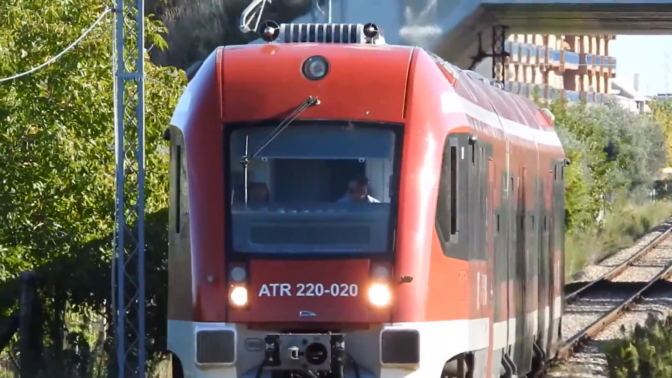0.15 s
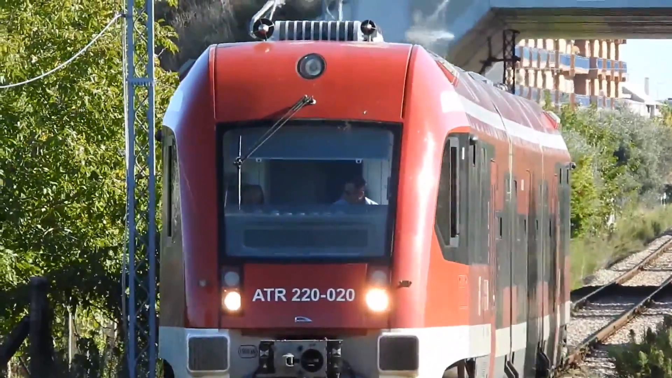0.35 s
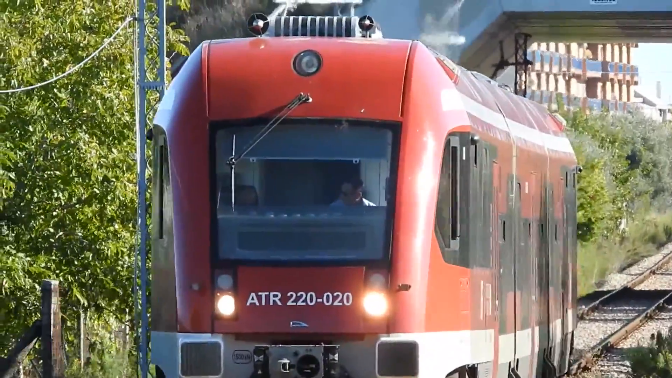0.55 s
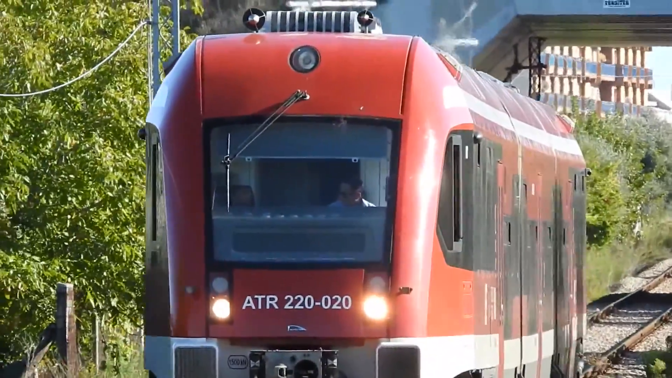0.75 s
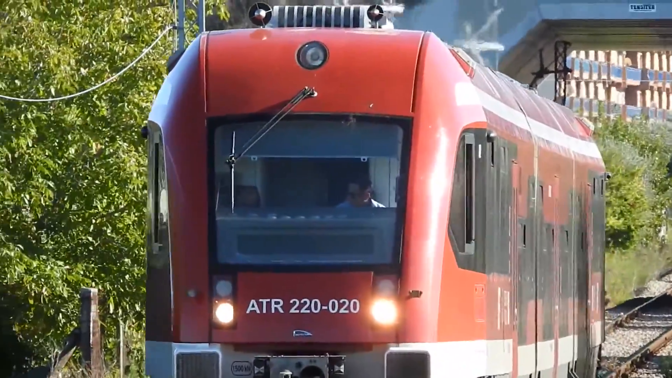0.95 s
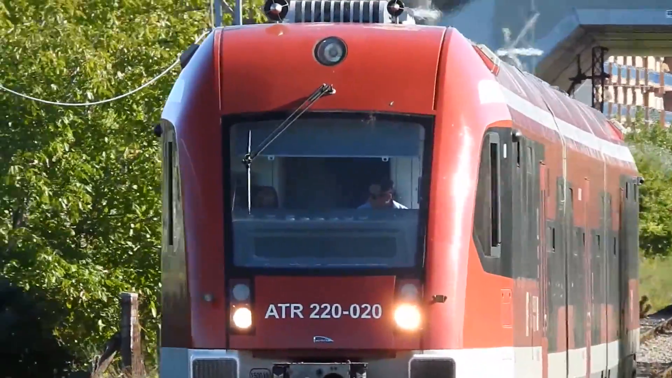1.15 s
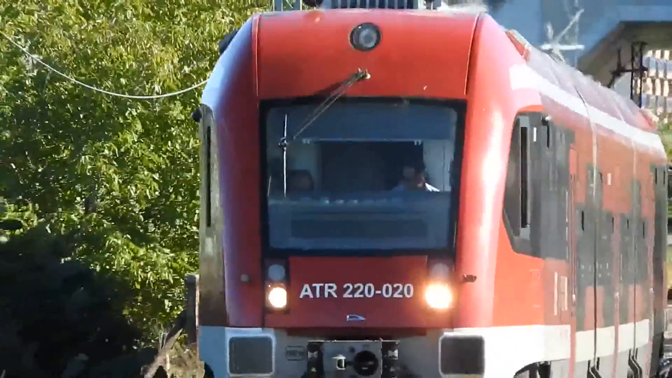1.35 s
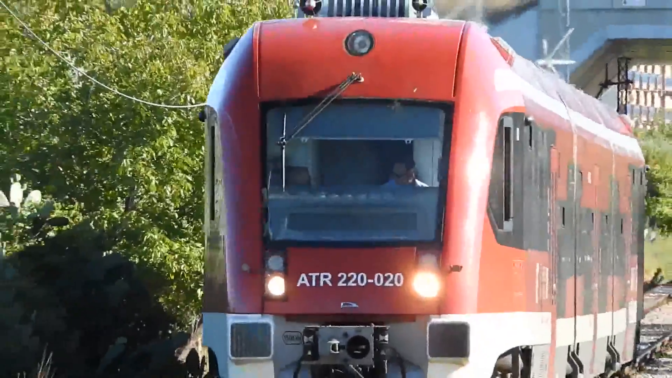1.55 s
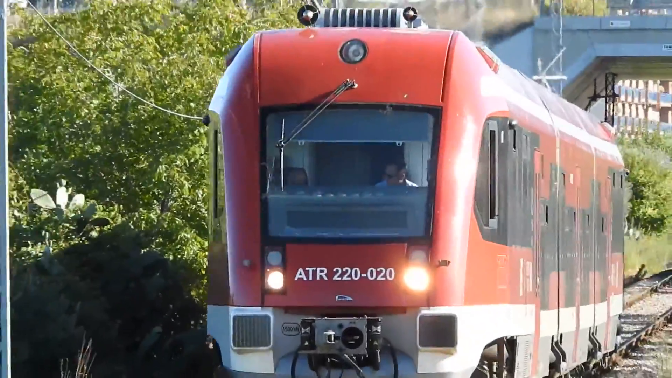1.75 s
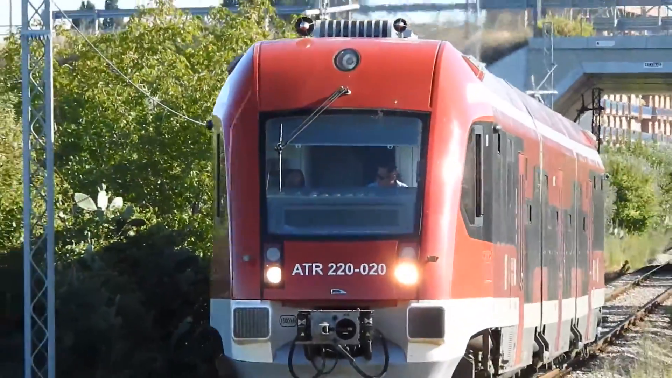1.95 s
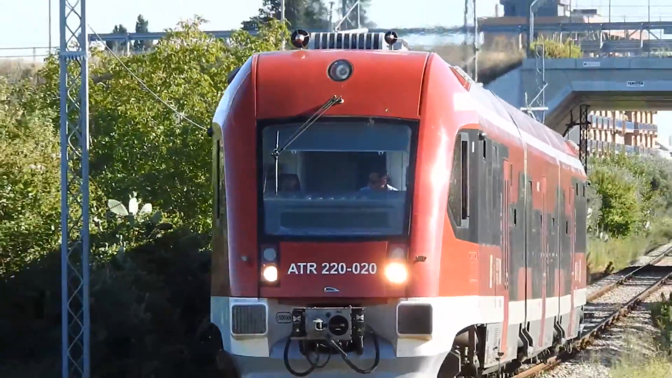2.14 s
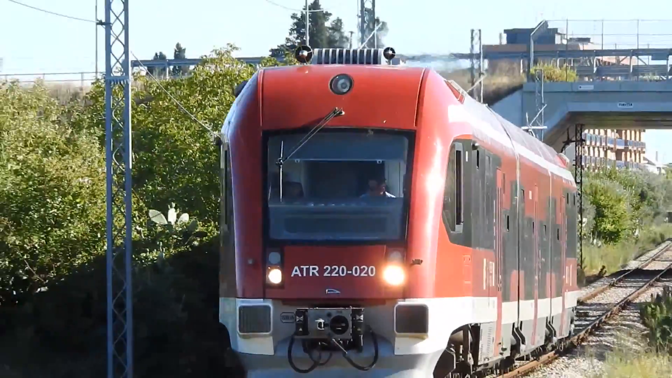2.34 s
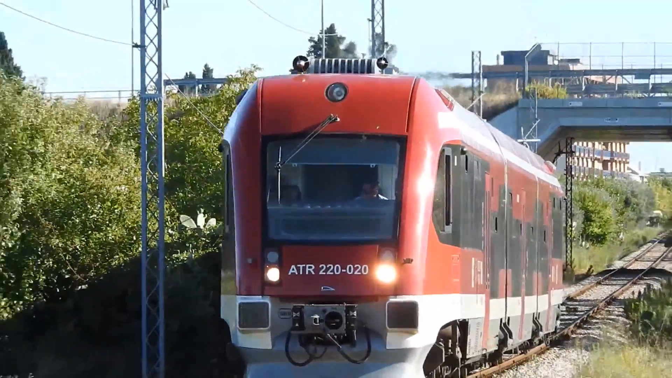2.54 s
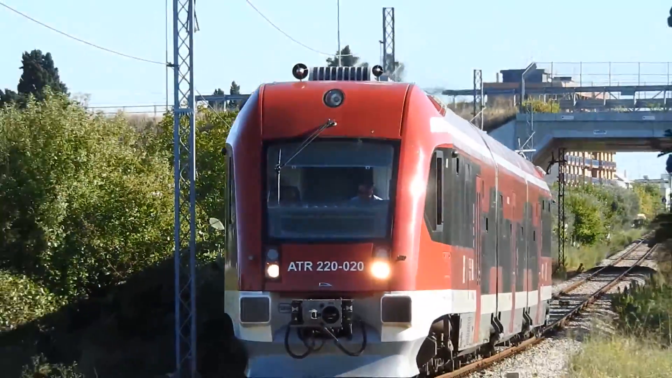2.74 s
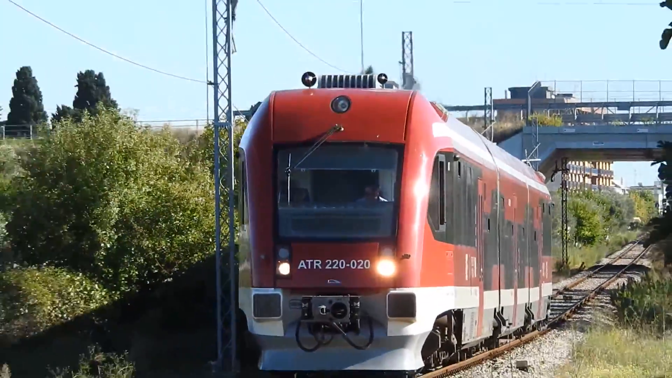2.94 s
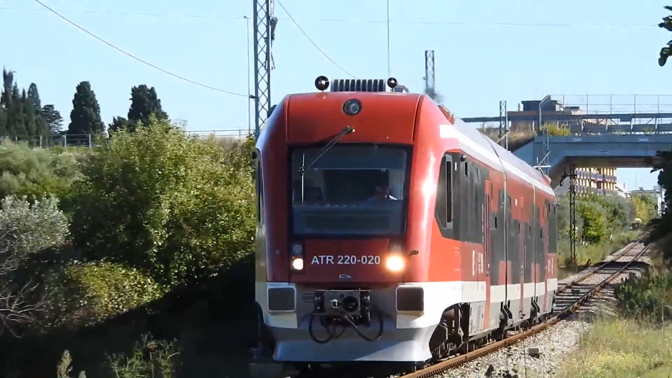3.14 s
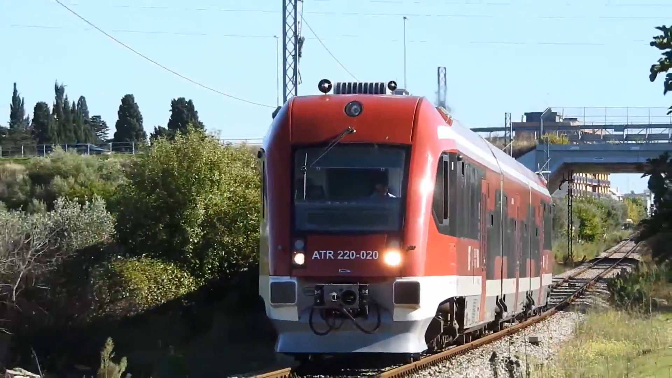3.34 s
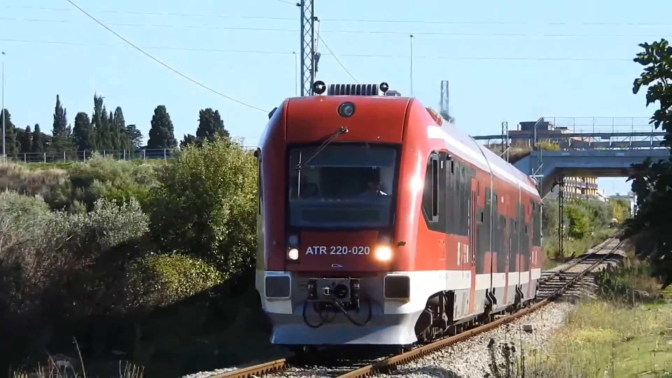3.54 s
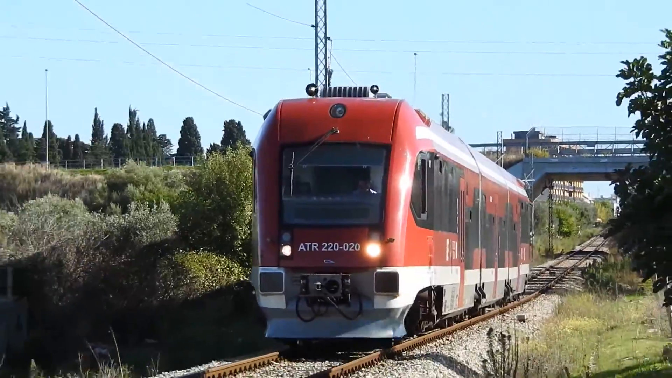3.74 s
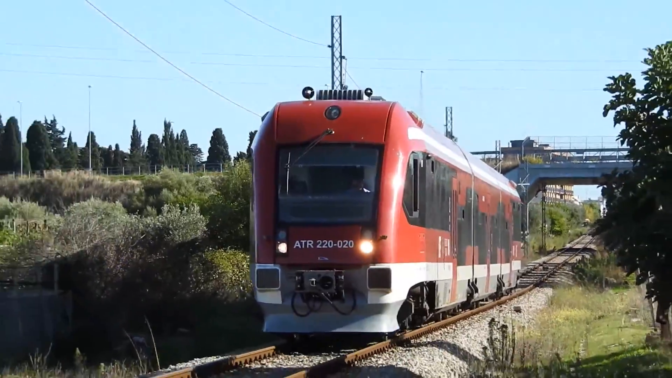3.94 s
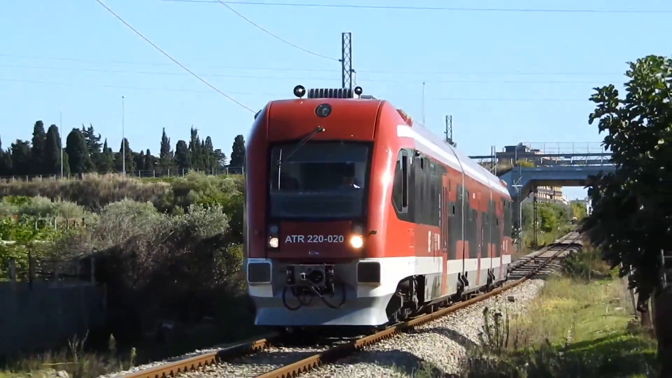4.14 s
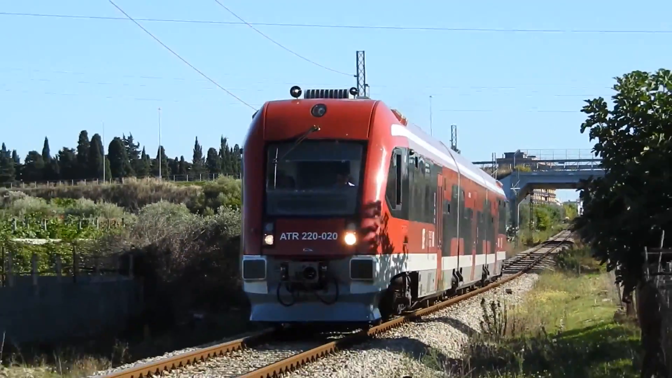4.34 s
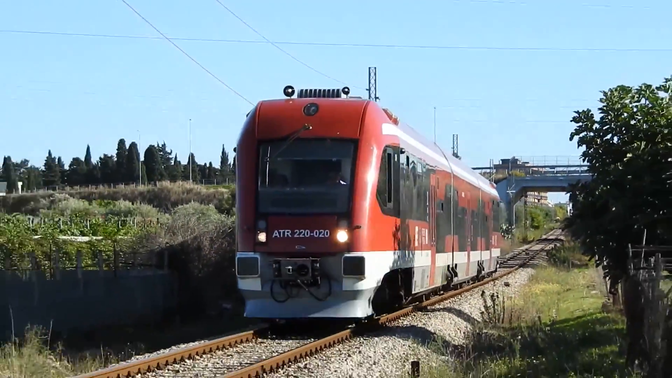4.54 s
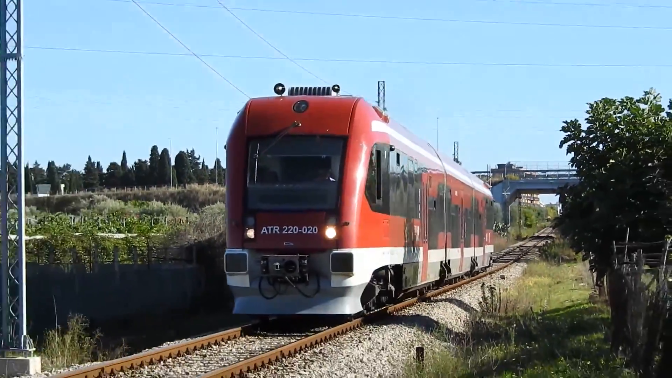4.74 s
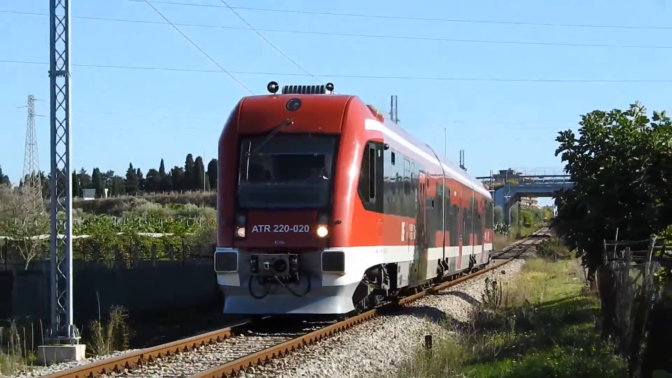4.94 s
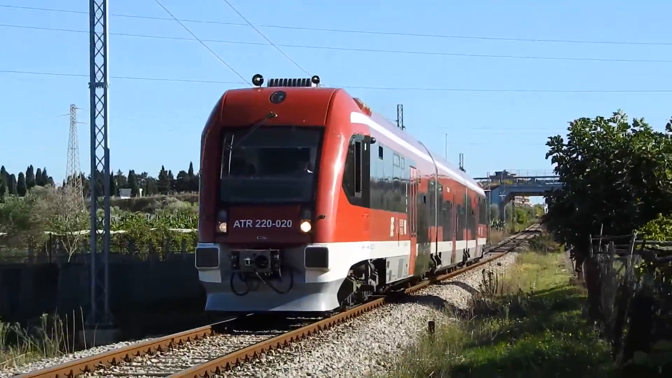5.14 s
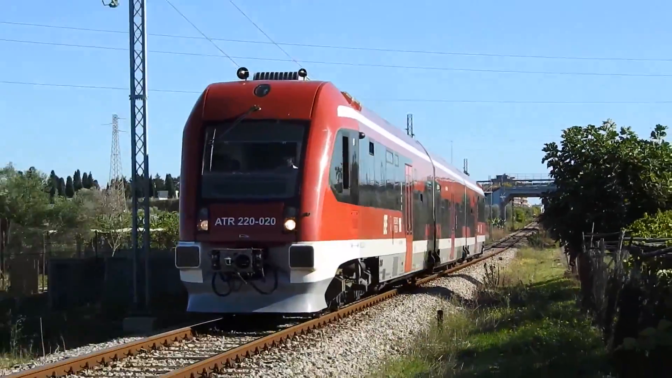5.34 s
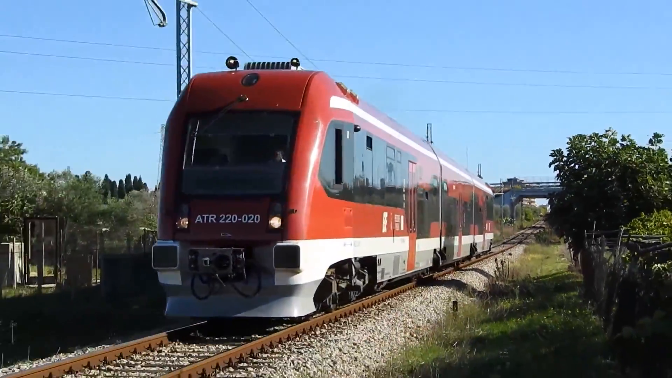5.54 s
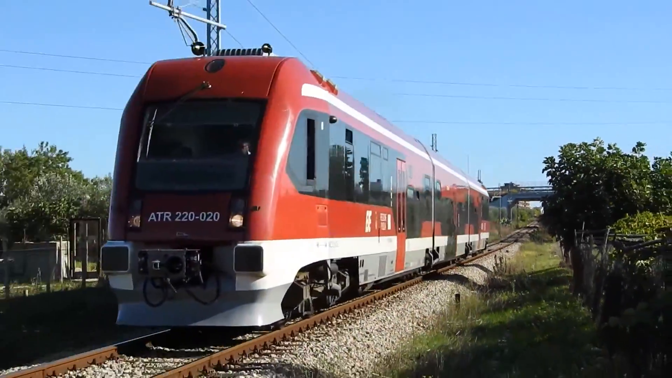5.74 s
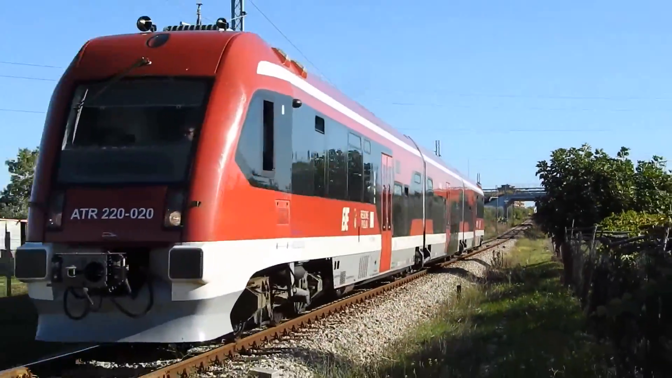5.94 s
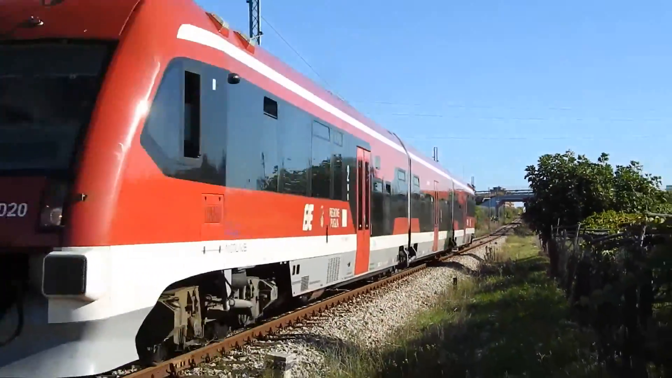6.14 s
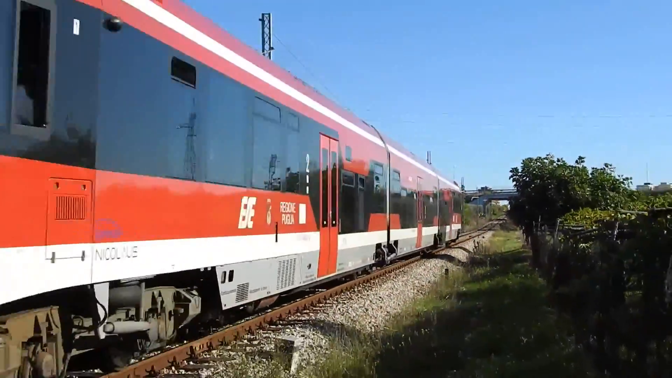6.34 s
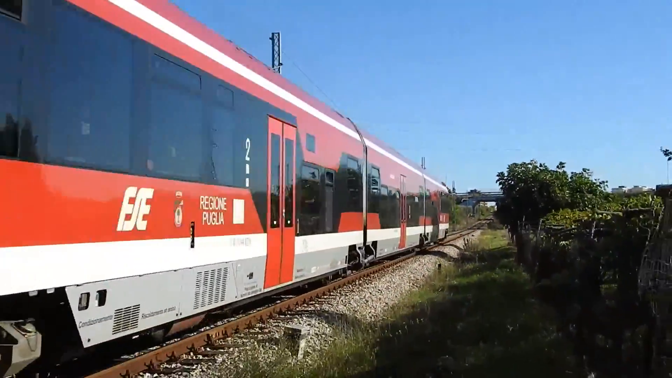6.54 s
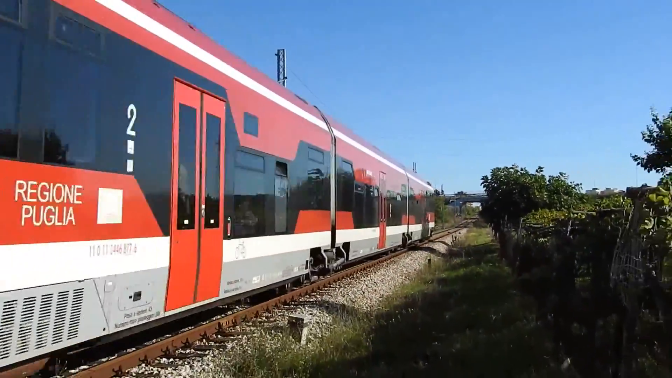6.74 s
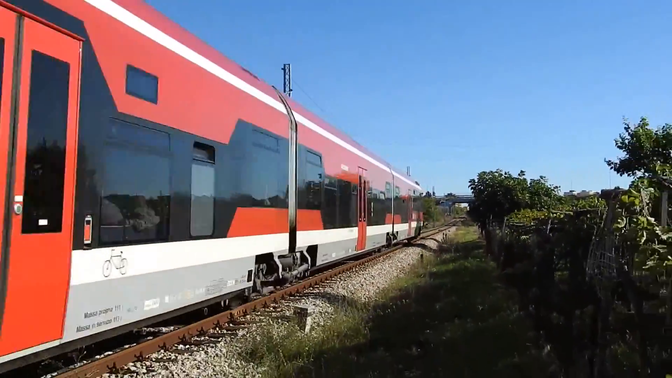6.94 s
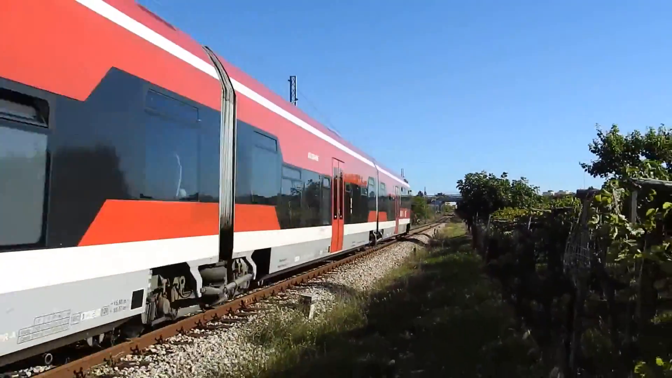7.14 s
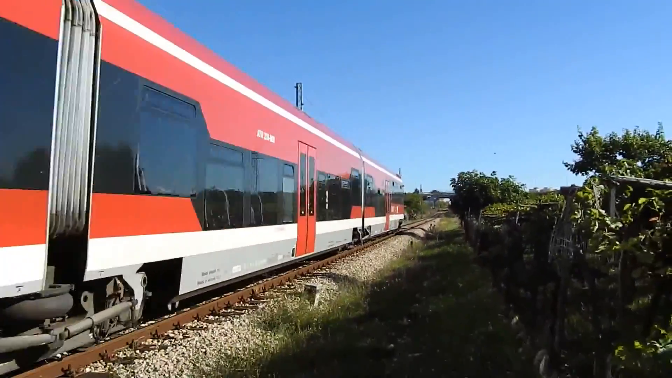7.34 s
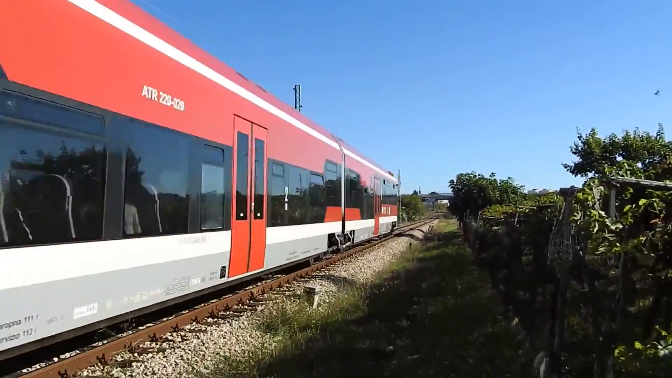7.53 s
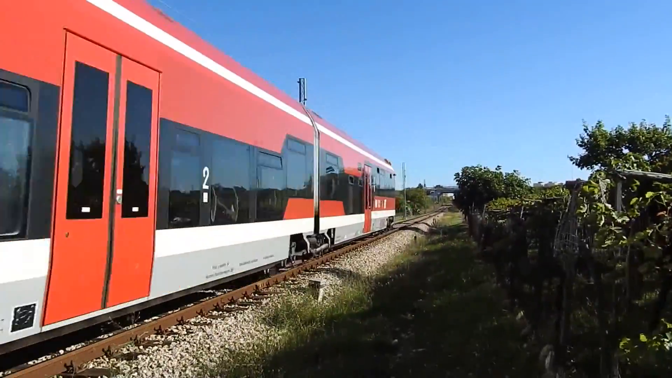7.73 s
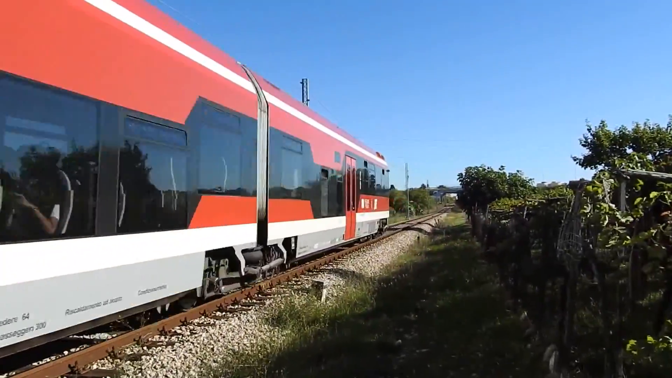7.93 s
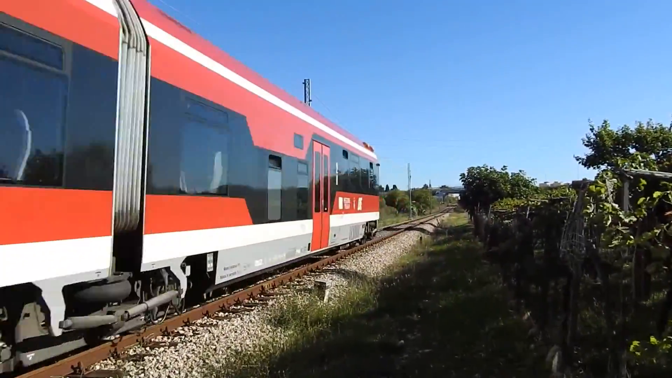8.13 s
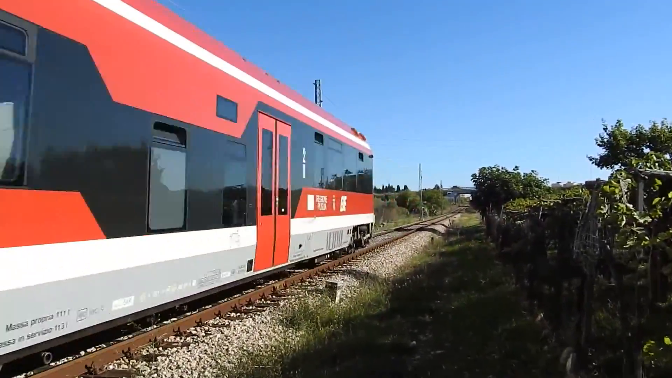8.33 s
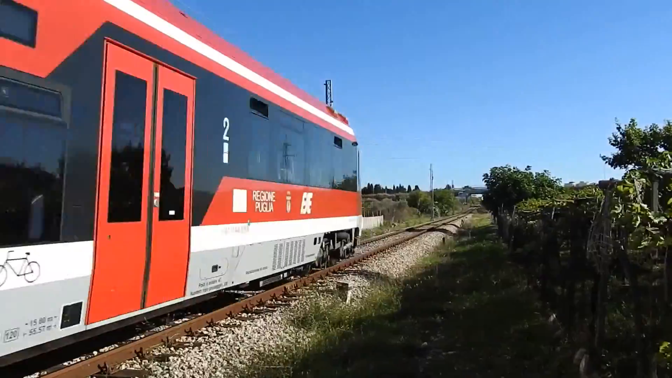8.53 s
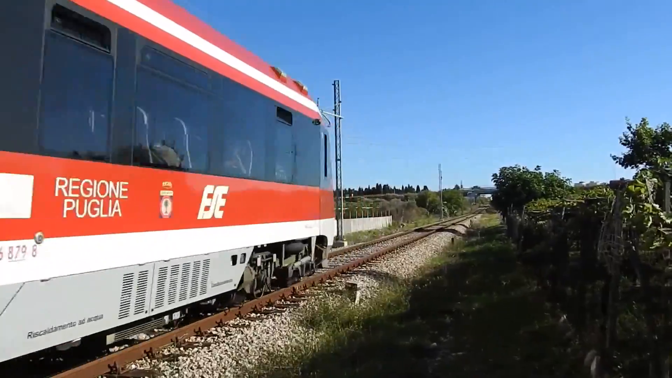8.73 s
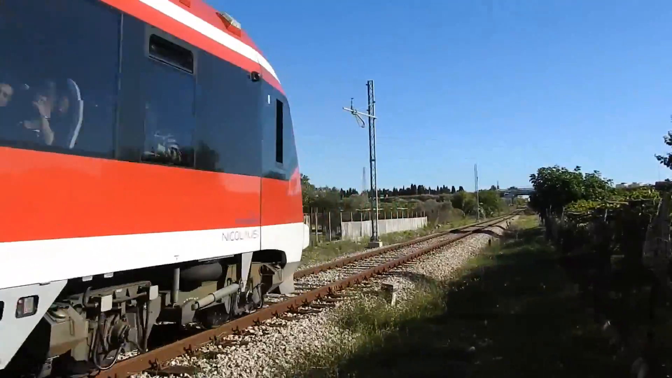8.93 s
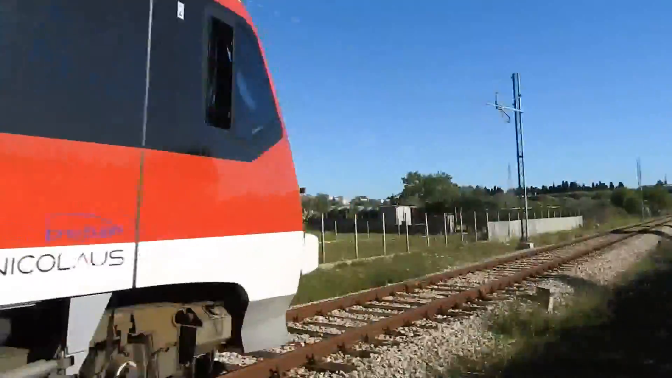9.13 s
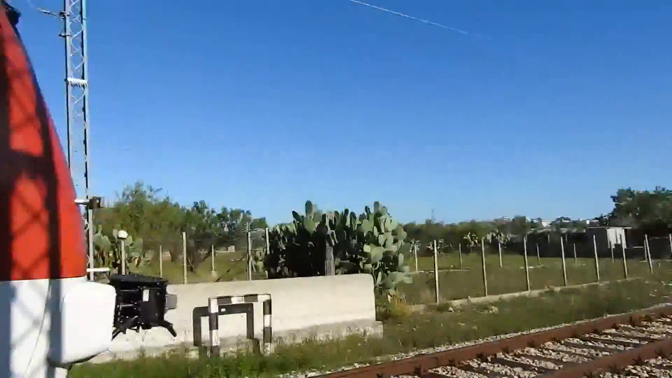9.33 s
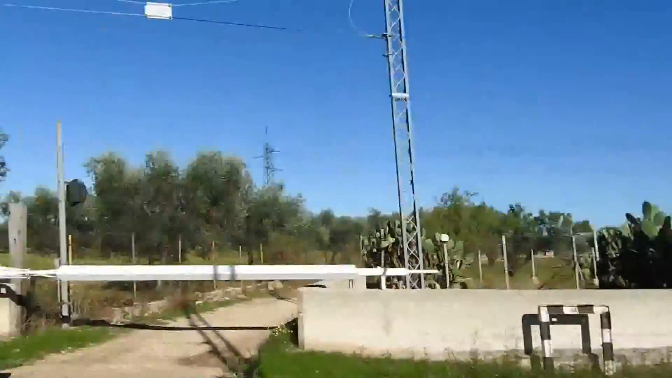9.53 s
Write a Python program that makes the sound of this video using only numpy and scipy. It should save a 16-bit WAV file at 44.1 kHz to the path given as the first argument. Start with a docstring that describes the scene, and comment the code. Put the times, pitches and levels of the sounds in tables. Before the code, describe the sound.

Heard from beside an open-air track, a low diesel hum approaches, with a few soft gusts on the microphone and a quiet lens motor whirr. The drone rises slightly, swells and throbs. Then the train rolls by close on the left: a cluster of sharp knocks at a rail joint, followed by lighter clacks, growling wheels, short chirps and a high, airy whistle, as the engine note drops.

```python
"""A distant diesel drone comes round a bend while wind puffs at the microphone and a camera's zoom whirrs.
The railcar opens its throttle and passes close on the left: two exhausts drone and beat, two turbos
whistle, each sinking in pitch as it goes by. Flanges chirp on the curve, and four bogies knock over a
rail joint and growl past, rough wheels on rough rail. The hardest knock ducks the limiter."""
import sys
import numpy as np
from scipy import signal
from scipy.fft import irfft
from scipy.io import wavfile
from scipy.ndimage import uniform_filter1d

SR = 44100
rng = np.random.default_rng(int(sys.argv[2]) if len(sys.argv) > 2 else 0)


def wrap_up_sound(samples):
    """Save the sound to the file named by the first command line argument, as 16-bit audio."""
    columns = np.atleast_2d(samples).T
    # keep every value between -1 and 1, then stretch to whole-number steps
    tamed = np.clip(columns, -1, 1)
    steps = np.round(tamed * 32767).astype(np.int16)
    wavfile.write(sys.argv[1], SR, steps)


N = 426888
T = np.arange(N) / SR
HZ, FRAME_S = np.fft.rfftfreq(1024, 1 / SR), np.arange(N // 512 + 2) * 512 / SR  # grid for shaping noise
SPEED_M_PER_S, SOUND_M_PER_S, TRACK_AWAY_M = 18.5, 343, 4.0
AHEAD, BESIDE = 0.16, 0.91  # the train's first and last bearing

# the throttle both diesels follow: time_s, firing_hz
THROTTLE = [(0, 87.47), (3.55, 88.8), (4.1, 94.73), (4.9, 99.73), (8.05, 100.2), (9.68, 87.3)]
# bogies going by: abreast_s, rumble_db, growl_db, roar_db, hiss_db, air_db, clatter_db
BOGIES = [(6.67, -52, -21, -31, -32, -31, -31), (7.53, -26.5, -24.5, -40.5, -36.5, -46, -26),
          (8.359, -27.5, -18.5, -32, -38, -43, -24), (9.16, -20.5, -17, -21.5, -27.5, -31.5, -24)]


def amp(db):
    """Decibels to gain."""
    return 10 ** (np.asarray(db) / 20)


def evened(x):
    """Scales to an rms of one."""
    return x / np.sqrt(np.mean(x ** 2) + 1e-20)


def curve(rows, t):
    """A breakpoint envelope, joined by straight lines."""
    return np.interp(t, *np.transpose(rows))


def by_hz(rows, column=1):
    """One column of a table, along log frequency."""
    rows = np.array(rows)
    return np.interp(np.log(HZ + 1), np.log(rows[:, 0]), rows[:, column])


def add(mix, start_s, sound):
    """Mixes a sound in at a given time."""
    part = mix[..., round(start_s * SR):][..., :sound.shape[-1]]
    part += sound[..., :part.shape[-1]]


def wander(rate_hz, t=T):
    """Random drift of about unit size."""
    return np.interp(t * rate_hz, np.arange(1000), rng.standard_normal(1000))


def resonate(x, hz, width_hz):
    """A steep resonance that can follow a moving pitch, at unit rms."""
    carrier = np.exp(2j * np.pi * np.cumsum(hz * np.ones(x.shape[-1])) / SR)
    pole = np.exp(-np.pi * width_hz / SR)
    return evened((carrier * signal.lfilter([1], [1, -2 * pole, pole * pole], x / carrier)).real)


def panned(left_db):
    """Left and right gains for a level difference."""
    return amp(np.array([np.atleast_1d(left_db), -np.atleast_1d(left_db)]) / 2)


def bearing(t):
    """The train swings round to the left as its nose goes by: 0 is ahead, 1 beside."""
    swing_s, swing_lasts_s = 6.38, 0.45
    return AHEAD + (BESIDE - AHEAD) * (1 + np.tanh((t - swing_s) / swing_lasts_s)) / 2


def passing(abreast_s, reach_m, t=T):
    """Gain of a part that radiates sideways: 1 when abreast, fading with distance along the track."""
    return (1 + (SPEED_M_PER_S * (t - abreast_s) / reach_m) ** 2) ** -.75


def approach(abreast_s):
    """Share of the train's speed that points at the listener: 1 coming, -1 going."""
    to_go_m = SPEED_M_PER_S * (abreast_s - T)
    return to_go_m / np.hypot(to_go_m, TRACK_AWAY_M)


def doppler(abreast_s):
    """Pitch factor of a passing part: sharp coming, flat going."""
    return 1 / (1 - approach(abreast_s) * SPEED_M_PER_S / SOUND_M_PER_S)


def shaded(abreast_s, behind_db):
    """Gain of an outlet that throws its sound forwards, and so is quieter once it has gone by."""
    return amp(behind_db * (1 - approach(abreast_s)) / 2)


def exhaust(abreast_s, late_s, level_db, jitter, waver_db):
    """Six cylinders fire three times a turn, unevenly, which adds weak, wavering orders in between."""
    # exhaust partials: crank_multiple, gain_db
    orders = [(2, -33), (3, -0.5), (4, -25.5), (4.5, -24.5), (5, -24), (6, -23.5), (7, -41), (7.5, -30),
              (9, -37.5), (10, -36), (11, -41), (12, -32), (13, -39), (13.5, -37), (15, -40.5)]
    firing_hz = curve(THROTTLE, T - late_s) * doppler(abreast_s)
    crank_turns = np.cumsum(firing_hz * (1 + jitter * wander(18))) / (3 * SR)
    out = np.zeros(N)
    for order, db in orders:
        weight = np.interp(T, FRAME_S, amp(db + waver_db * (db < -10) * wander(8.1, FRAME_S)))
        out += weight * np.sin(2 * np.pi * (order * crank_turns + rng.random()))
    return np.sqrt(2) * amp(level_db) * out


def beating_db():
    """Six dips in the drone: the engines beat as they run up, ever slower as their speeds draw together."""
    start_s, first_beat_s, growth, dip_db = 4.31, 0.1662, 1.348, -5.5
    lengths_s = first_beat_s * growth ** np.arange(6)
    times_s = start_s + np.cumsum(lengths_s) - lengths_s
    return dip_db * sum(np.exp(-((T - s) / (0.2 * length)) ** 2) for s, length in zip(times_s, lengths_s))


def engines():
    """The drone of the front and rear diesels, over the hum of the auxiliary machines."""
    # fader ride of the front exhaust: time_s, level_db
    front_ride = [(0, -46), (.2, -30.5), (1.3, -29), (2.1, -32.5), (3.5, -22), (4.1, -20), (4.85, -12),
                  (5.53, -9), (5.82, -12), (6.18, -10), (6.29, -14), (6.4, -19), (6.8, -28.5), (7.1, -16),
                  (7.28, -16.5), (7.43, -25.5), (7.95, -23.5), (8.2, -27.5), (9.68, -43)]
    # auxiliary machines: pitch_hz, level_db
    hum_tones = [(61.5, -42), (155.3, -40), (255, -60), (368, -62), (742, -67)]
    # where the drone sits in the stereo field: time_s, left_db
    drone_pan = [(2, -1.5), (4.8, 0.4)]
    front_s, rear_s = 7.13, 9.07  # when each is abreast
    front_db = curve(front_ride, T) + beating_db()
    front = exhaust(front_s, late_s=0, level_db=front_db, jitter=.00475, waver_db=4)
    rear = exhaust(rear_s, late_s=.18, level_db=-21.5, jitter=.004, waver_db=2)
    rear *= passing(rear_s, reach_m=5) * shaded(rear_s, behind_db=-10)
    hum = sum(amp(db + 2.7 * wander(5.5)) * np.sin(2 * np.pi * hz * T + 0.5 * wander(4.6))
              for hz, db in hum_tones)
    return (front + rear + np.sqrt(2) * hum) * panned(curve(drone_pan, T))


def band(ahead, beside, level_db, flicker_db):
    """Power over time and frequency of one noise, whose colour swings round with the train."""
    side = bearing(FRAME_S)[:, None]
    power = (1 - side) * evened(amp(by_hz(ahead))) ** 2 + side * evened(amp(by_hz(beside))) ** 2
    flicker = evened(uniform_filter1d(rng.standard_normal(len(FRAME_S)), size=2))
    return power * amp(level_db + flicker_db * flicker)[:, None] ** 2


def rush(power, patchy_db):
    """Patchy noise of the given power, as the two microphone ports hear it from the train's bearing."""
    # stereo image: freq_hz, coherence_ahead, coherence_beside, left_beside_db, lag_beside_rad
    ports = [(60.4, 0.075, 0.44, 0, -1), (150, 0.63, 1, -1, 0), (298, 0.9, 0.98, 8.5, 0.5),
             (970, 0.96, 0.97, 9, -0.2), (2600, 0.72, 0.5, 8, 1), (5511, 0.62, 0.72, 8, -1.5),
             (7900, 0.307, 0.76, 6.5, -2.5), (12200, 0.37, 1, -2, -3.5)]
    a, b, c, d, patches = rng.standard_normal((5,) + power.shape)
    patches = evened(uniform_filter1d(uniform_filter1d(patches, size=3, axis=0), size=8, axis=1))
    side = bearing(FRAME_S)[:, None]
    coherence = np.clip((1 - side) * by_hz(ports) + side * by_hz(ports, column=2), -1, 1)
    lean = amp(side * by_hz(ports, column=3) / 2)
    lag = np.exp(-1j * side ** 2 * by_hz(ports, column=4))
    left = a + 1j * b
    right = coherence * left + np.sqrt(1 - coherence ** 2) * (c + 1j * d)
    spectra = np.array([left * lean, right * lag / lean])
    spectra *= np.sqrt(power) * amp(patchy_db * patches) / np.hypot(lean, 1 / lean)
    frames = irfft(spectra, norm="ortho") * signal.windows.cosine(1024)
    return (frames[:, :-1, 512:] + frames[:, 1:, :512]).reshape(2, -1)[:, :N]  # overlap and add


def train_db(layer):
    """Level of one rolling layer: the whole train, fading with distance, plus each part going by."""
    # the whole train, by layer: ahead_db, beside_db, reach_m, ground_loss_db_per_m, background_db
    train_noise = {"rumble": (-23.5, -28, 40, 0.12, -42.5), "growl": (-31, -28.5, 55, 0.25, -64),
                   "roar": (-30, -30.5, 30, 0.35, -53), "hiss": (-35, -41.5, 17.5, 0.09, -58.5),
                   "air": (-38.5, -46, 22.5, 0.17, -66)}
    # nose and underfloor equipment: abreast_s, rumble_db, growl_db, roar_db, hiss_db, air_db
    body_parts = [(6.13, -22, -25.5, -26, -32, -30.5), (7.02, -43, -46, -25, -30.5, -31.5),
                  (8.57, -27, -44, -28, -33, -40.5), (9.42, -46, -29, -27.5, -33.5, -32.5)]
    # how near a part must be to stand out: rumble_m, growl_m, roar_m, hiss_m, air_m
    part_reach_m = [3.3, 3.5, 4, 4.1, 4.4]
    ahead_db, beside_db, reach_m, loss_db_per_m, background_db = train_noise[layer]
    column = list(train_noise).index(layer)
    arrives_s, leaves_s = 5.397, 9.9
    away_m = SPEED_M_PER_S * abs(FRAME_S - np.clip(FRAME_S, arrives_s, leaves_s))
    swing = (bearing(FRAME_S) - AHEAD) / (BESIDE - AHEAD)
    whole_db = ahead_db + (beside_db - ahead_db) * swing - loss_db_per_m * away_m
    power = amp(whole_db) ** 2 / (1 + (away_m / reach_m) ** 2)
    for abreast_s, *levels_db in [*BOGIES, *body_parts]:
        power += (amp(levels_db[column]) * passing(abreast_s, part_reach_m[column], FRAME_S)) ** 2
    return 10 * np.log10(power + amp(background_db) ** 2)


def clatter_db():
    """Level of the brief roar of each bogie on a rail joint, just before it comes abreast."""
    joint_ahead_m, reach_m = 8.3, 1.1
    early_s = joint_ahead_m / SPEED_M_PER_S
    power = sum((amp(db) * passing(s - early_s, reach_m, FRAME_S)) ** 2 for s, *_, db in BOGIES)
    return 10 * np.log10(power)


def rolling():
    """Rough wheels on rough rail: ground rumble, bogie growl, wheel roar, rail hiss and rushing air."""
    # each layer's colour from ahead and from beside: freq_hz, relative_db
    rumble_ahead = [(20, -48), (35, -48), (50, -41), (64, 0), (85, 9), (120, 0), (150, -2.5), (195, -10.5),
                    (235, -16), (290, -33), (900, -100)]
    rumble_beside = [(20, -42), (35, -39), (50, -33), (64, -4), (85, -1.5), (120, -14), (150, 1),
                     (195, 5.5), (235, -0.5), (290, -43), (900, -100)]
    growl_ahead = [(170, -45), (245, -2), (285, -9.5), (325, 3), (375, -2), (440, -4.5), (500, -3),
                   (560, -24), (700, -14), (1500, -100)]
    growl_beside = [(150, -35), (235, -20), (275, -4), (320, 3), (350, -8), (390, 0.5), (440, -5),
                    (500, -8.5), (560, -12.5), (700, -15), (1500, -100)]
    roar_ahead = [(300, -60), (480, -15), (560, -4), (700, -2), (850, 1.5), (985, -0.5), (1190, -9.5),
                  (1360, -5), (1650, -24), (1900, -40), (4000, -100)]
    roar_beside = [(300, -60), (480, -15), (560, -0.5), (770, -4.5), (1130, -7), (1650, -17), (1900, -30),
                   (4000, -100)]
    hiss_ahead = [(900, -49), (1500, 2.5), (1750, -1.5), (2100, 0.5), (2540, 1), (3000, -2.5), (3500, -4.5),
                  (4030, -1.5), (4700, -9), (5700, -8), (6700, -4.5), (7400, -9.5), (12000, -68)]
    hiss_beside = [(900, -70), (1500, -9), (1750, 0), (2000, -1.5), (2400, 0.5), (3120, -2), (3700, -3.5),
                   (4150, -3), (5200, -4.5), (6700, -6.5), (7400, -11), (12000, -70)]
    air_ahead = [(3000, -70), (6500, -23), (7100, 1.5), (8500, -1), (10000, 3), (11300, 2.5), (11900, -12),
                 (12500, -4.5)]
    air_beside = [(3000, -70), (6500, -4), (7100, -3), (8500, 1), (10000, 4), (11000, 1.5), (11600, -8),
                  (12300, -16)]
    rumble = band(rumble_ahead, rumble_beside, train_db("rumble"), flicker_db=0.36)
    growl = band(growl_ahead, growl_beside, train_db("growl"), flicker_db=1.56)
    roar = band(roar_ahead, roar_beside, train_db("roar"), flicker_db=0)
    clatter = band(roar_ahead, roar_beside, clatter_db(), flicker_db=-3)
    clatter += band(hiss_ahead, hiss_beside, clatter_db() - 14, flicker_db=-0.5)
    hiss = band(hiss_ahead, hiss_beside, train_db("hiss"), flicker_db=0.16)
    air = band(air_ahead, air_beside, train_db("air"), flicker_db=0.5)
    return rush(rumble + growl + roar + clatter + hiss + air, patchy_db=1.5)


def wind():
    """Short low puffs buffet the microphone, mostly on the right port."""
    # colour of the buffeting: freq_hz, relative_db
    colour = [(20, -44), (60, -11), (110, 3.5), (160, 3), (210, -7), (280, -21), (450, -22), (1500, -100)]
    # puffs of wind: peak_s, gain_db, half_length_s
    puffs = [(0.391, -27.5, 0.06), (1.3, -27.5, 0.16), (2.493, -26.5, 0.13), (2.585, -19, 0.082),
             (2.739, -14.5, 0.036), (2.805, -13.5, 0.036), (2.86, -22, 0.04), (2.906, -14, 0.0095),
             (2.947, -14, 0.024), (3.008, -18, 0.02), (3.101, -18, 0.065), (3.507, -24, 0.058),
             (3.703, -28, 0.12)]
    strength = sum(amp(db) * np.exp(-2 * np.minimum(abs(T - s) / half_s, 10) ** 2)
                   for s, db, half_s in puffs)
    buffet = rush(band(colour, colour, level_db=-6.5, flicker_db=2), patchy_db=0.5)
    return buffet * strength * panned(-11)


def burst(peak_s, level_db, pitch_hz, length_s, width_hz):
    """One short swell of noise in a resonance, placed on the timeline."""
    out, count = np.zeros(N), round(length_s * SR)
    ring = evened(resonate(rng.standard_normal(SR), pitch_hz, width_hz)[-count:])
    add(out, peak_s - length_s / 2, amp(level_db) * ring * np.hanning(count))
    return out


def camera_zoom():
    """The zoom lever ticks and the lens motor whirrs in the camera's shell, swelling until it stops."""
    # resonances of the whirr: pitch_hz, width_hz, relative_db
    resonances = [(1297, 50, -3), (2240, 60, -6), (2730, 80, -10), (2990, 300, -6), (3880, 260, -2.5),
                  (6540, 110, -10), (8700, 280, -14), (10300, 490, -7.5)]
    # a finger on the lever: peak_s, level_db, pitch_hz, length_s
    taps = [(1.288, -50, 2700, .03), (1.298, -53, 5200, .008), (1.335, -46, 1100, .07),
            (1.336, -39, 240, .03), (1.339, -36, 1200, .009), (1.3385, -40, 2200, .007),
            (1.346, -47, 4800, .01), (1.3485, -50, 8000, .005)]
    start_s, stop_s, ramp_s = 1.27, 5.45, .1
    first_db, rise_db, swell_s = -58, 7, 2.3
    running_s = np.maximum(T - start_s, 0)
    gate = np.clip(np.minimum(running_s, stop_s - T) / ramp_s, 0, 1)
    level_db = first_db + rise_db * (1 - np.exp(-running_s / swell_s))
    whirr = sum(amp(db) * resonate(rng.standard_normal(N), hz, width) for hz, width, db in resonances)
    ticks = sum(burst(*tap, width_hz=1100) for tap in taps)
    return (evened(whirr) * gate * amp(level_db) + ticks) * panned(8.6)


def flanges():
    """Wheels ring on the curve and their flanges chirp briefly against the rail."""
    # rings and chirps: peak_s, level_db, pitch_hz, length_s
    squeaks = [(2.85, -53, 5700, .08), (5.3, -35, 880, .9), (5.795, -35.5, 2800, .05),
               (5.95, -30.5, 845, .6), (6.055, -32, 2500, .06), (7.87, -37, 2400, .06),
               (8.72, -39, 2300, .35), (8.9, -40, 2550, .3), (9.45, -40, 3100, .4)]
    chirps = sum(burst(s, db, hz, length_s, width_hz=.14 * hz) for s, db, hz, length_s in squeaks)
    return chirps * panned(7 * bearing(T))


def turbo(abreast_s, late_s, top_hz, spool, width_hz, level_db, reach_m, behind_db):
    """A whistle that follows engine speed to the power of spool; the air absorbs it from afar."""
    loss_db_per_m = 0.38
    speed = curve(THROTTLE, T - late_s)
    pitch_hz = top_hz * (speed / speed.max()) ** spool * doppler(abreast_s)
    whistle = resonate(rng.standard_normal((2, N)), pitch_hz, width_hz)
    absorbed_db = loss_db_per_m * SPEED_M_PER_S * abs(T - abreast_s)
    return amp(level_db - absorbed_db) * whistle * passing(abreast_s, reach_m) * shaded(abreast_s, behind_db)


def turbos():
    """Two fuzzy turbocharger whistles: the front has a thin tone inside it, the rear is spinning down."""
    front = turbo(7.16, 0, top_hz=11030, spool=1, width_hz=700, level_db=-30, reach_m=3.4, behind_db=-6.5)
    tone = turbo(7.13, 0, top_hz=11220, spool=.8, width_hz=110, level_db=-48, reach_m=20, behind_db=-4)
    rear = turbo(9.2, .18, top_hz=11000, spool=2.1, width_hz=1200, level_db=-35.8, reach_m=10,
                 behind_db=-7)
    return front + tone + rear


def knocks():
    """Each wheel blow, a sharp contact and a short rattle, rings the bogie and track."""
    # wheels striking the rail: start_s, level_db, clang_over_thud_db, sharpness (0-1)
    blows = [(6.134, -20, 0, .8), (6.150, -17, -10, .5), (6.2355, -16, 6, .4), (6.2395, -8, 2, .95),
             (6.2495, -6.5, -1, .88), (6.268, -17, 0, .6), (6.376, -23.5, 4, .3), (6.520, -17, -10, .85),
             (6.526, -12, -12, .8), (6.699, -15, -13, .8), (7.084, -20, 3, .6), (7.21, -22, -4, .4),
             (7.35, -25, 1, .4), (7.52, -21.5, -9, .3), (7.575, -26, 3, .4), (7.712, -24, -2, .3),
             (7.908, -22.5, 3, .2), (8.035, -27, 6, .1), (8.24, -18, -11, .3), (8.733, -21, 3, .2),
             (8.847, -19.5, 3, .2), (8.998, -16, -4, .4), (9.198, -19, -9, .4), (9.572, -21, -4, .3)]
    # modes of bogie and track: pitch_hz, relative_db, t60_s
    track_modes = [(190, -10, .07), (270, -8, .07), (335, -3, .07), (410, -5, .06), (520, -9, .05),
                   (690, -12, .05), (850, -8, .05), (980, -6, .04), (1130, -8, .04), (1400, -16, .03),
                   (2400, -24, .02)]
    rattle_s, blow_s, clang_above_hz = .005, .02, 600
    out, t = np.zeros((2, N)), np.arange(SR // 5) / SR
    for start_s, level_db, clang_db, sharpness in blows:
        ring = np.zeros(len(t))
        for hz, mode_db, t60_s in track_modes:
            wave = np.sin(2 * np.pi * hz * rng.uniform(.95, 1.05) * t)
            ring += amp(mode_db + clang_db * (hz > clang_above_hz) - 60 * t / t60_s) * wave
        rattle = rng.standard_normal(len(t)) * t * np.exp(-t / rattle_s)
        force = np.sqrt(1 - sharpness ** 2) * rattle / np.linalg.norm(rattle)
        force[0] = sharpness
        blow = signal.fftconvolve(force, ring)
        blow *= np.sqrt(blow_s * SR) / np.linalg.norm(blow)  # the energy of blow_s at unit rms
        add(out, start_s, amp(level_db) * blow * panned(7 * bearing(start_s)))
    # heavy wheels make a soft contact, with little treble
    return signal.lfilter(*signal.butter(3, 1800, fs=SR), out)


def axles():
    """Wheelsets drum by in surges: a wavering, sinking note in a rough resonance, with an overtone."""
    # drumming surges: peak_s, level_db, pitch_hz, half_length_s
    surges = [(6.63, -22.5, 345, .03), (6.675, -14, 301, .022), (6.765, -20, 370, .03),
              (7.41, -23, 335, .05), (7.54, -24, 385, .04), (7.705, -21, 325, .03), (8.11, -26, 370, .07),
              (8.235, -21.5, 310, .025), (8.335, -20, 390, .04), (8.475, -21.5, 385, .035),
              (8.527, -14, 366, .018), (9.11, -19.5, 335, .04), (9.19, -15, 382, .05),
              (9.63, -23.5, 375, .04)]
    waver, rough_db, overtone_ratio = .07, 2, 1.544
    out = np.zeros(N)
    for peak_s, level_db, hz, half_s in surges:
        near = abs(T - peak_s) < .5
        t, pitch_hz = T[near], hz * doppler(peak_s)[near]
        cycles = np.cumsum(pitch_hz * (1 + waver * wander(70, t))) / SR
        note = np.sqrt(2) * np.sin(2 * np.pi * cycles) * amp(rough_db * wander(90, t))
        body = resonate(rng.standard_normal(len(t)), pitch_hz, width_hz=112)
        overtone = resonate(rng.standard_normal(len(t)), pitch_hz * overtone_ratio, width_hz=112)
        drum = note + amp(-11.5) * body + amp(-12.5) * overtone
        out[near] += amp(level_db) * drum / (1 + ((t - peak_s) / half_s) ** 2)
    return out * panned(6.4 * bearing(T))


def scene():
    """The train, the wind and the camera, in stereo."""
    train = engines() + turbos() + rolling() + axles() + knocks() + flanges()
    return train + wind() + camera_zoom()


def record(dry):
    """Low cut and treble ripple of the microphone, a peak limiter, and a steep high cut."""
    # microphone colour, a narrow ripple in the treble: centre_hz, width_hz, gain_db
    ripple = [(3560, 30, -3.5), (3660, 35, -7), (3757, 35, -9), (3810, 35, 2), (3857, 45, -16),
              (3905, 40, 3.5), (3955, 40, -14), (4003, 35, 4)]
    low_cut_hz, high_cut_hz, release_db_per_s = 39, 12350, 38
    dry = signal.lfilter(*signal.butter(3, low_cut_hz, "high", fs=SR), dry)
    for hz, width_hz, db in ripple:
        dry = dry + (amp(db) - 1) * signal.lfilter(*signal.iirpeak(hz, hz / width_hz, SR), dry)
    peak_db = 20 * np.log10(abs(dry).max(0) + 1e-9)
    release_db = release_db_per_s * T
    duck_db = np.maximum(np.maximum.accumulate(peak_db + release_db) - release_db, 0)
    limited = np.clip(dry / amp(uniform_filter1d(duck_db, size=40)), -1, 1)
    high_cut = signal.firwin(255, high_cut_hz, window=("kaiser", 8), fs=SR)
    return signal.oaconvolve(limited, high_cut[None], "same")


dry = scene()
out = record(dry)
wrap_up_sound(out)
```